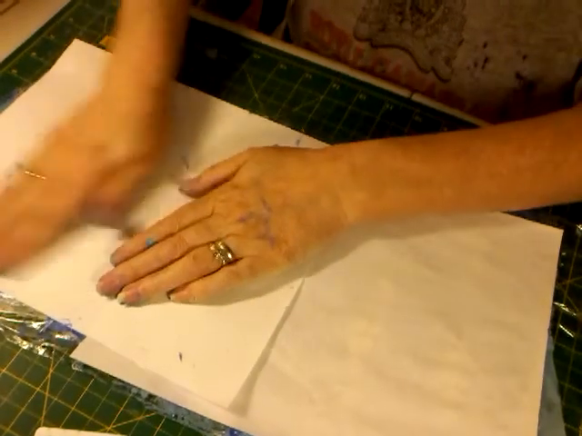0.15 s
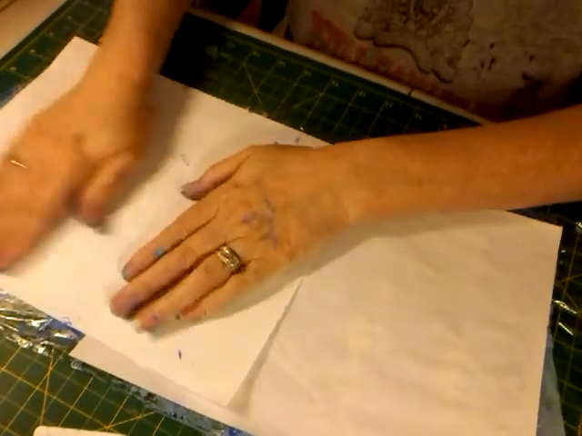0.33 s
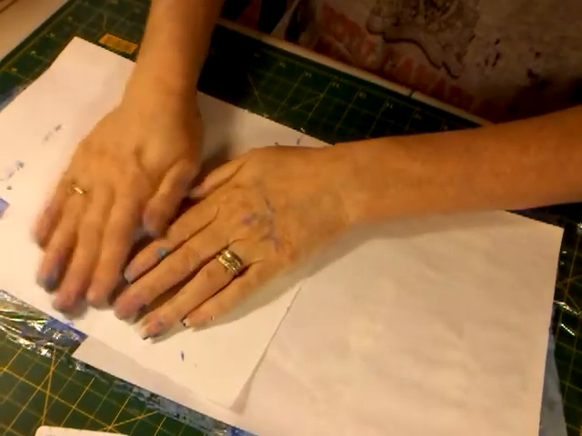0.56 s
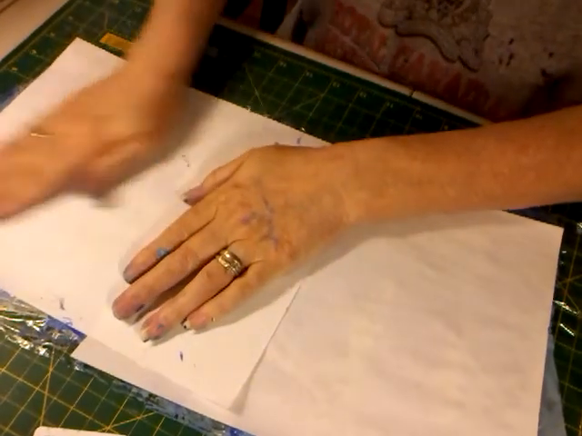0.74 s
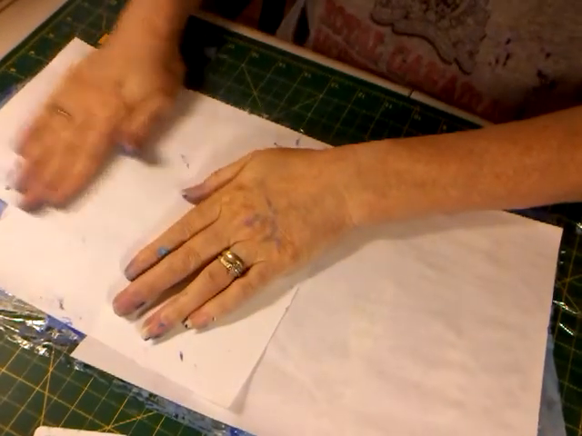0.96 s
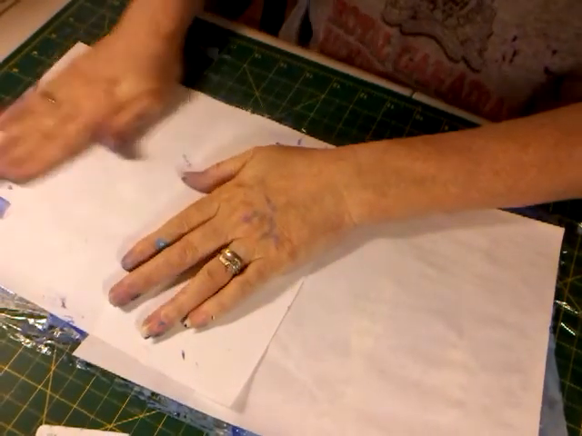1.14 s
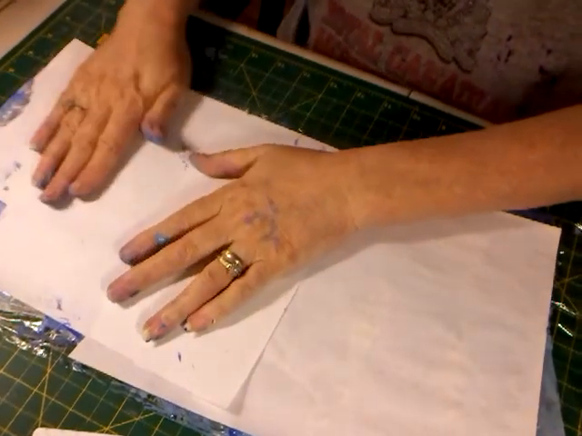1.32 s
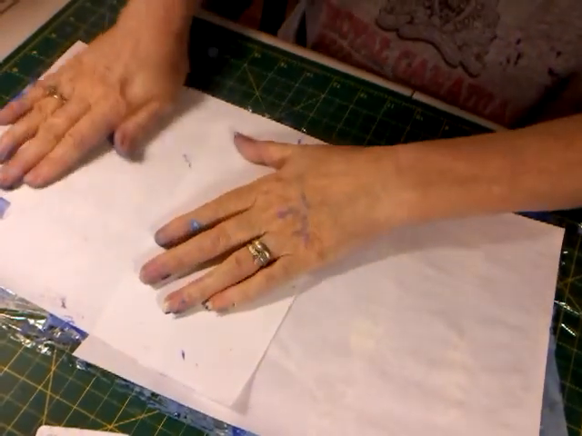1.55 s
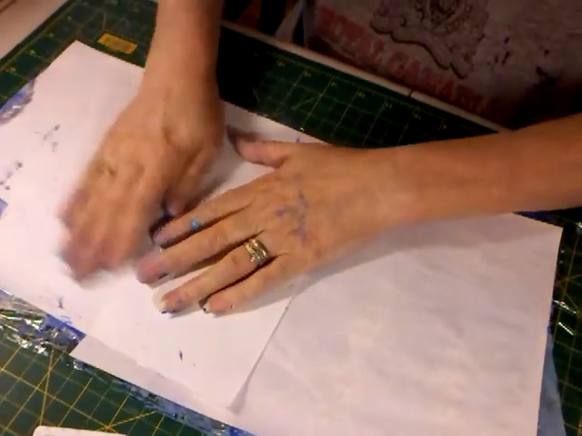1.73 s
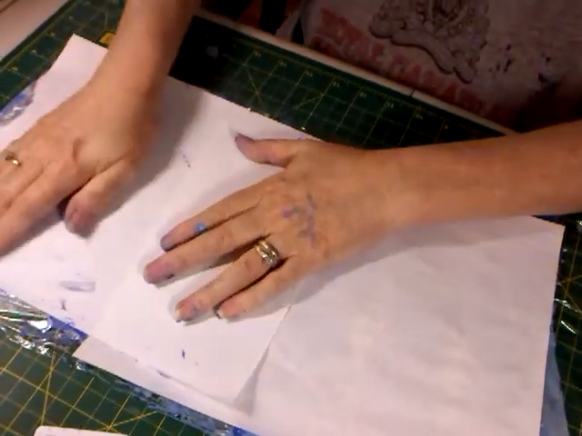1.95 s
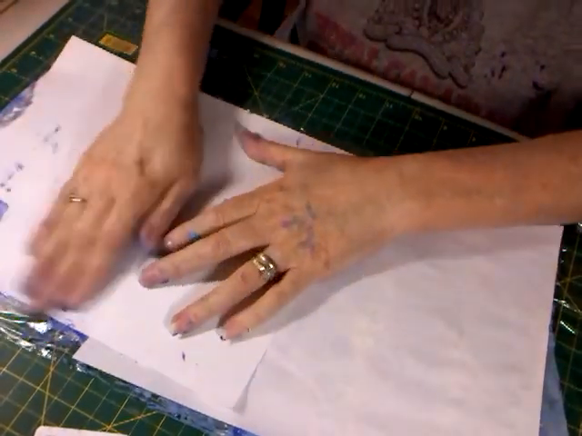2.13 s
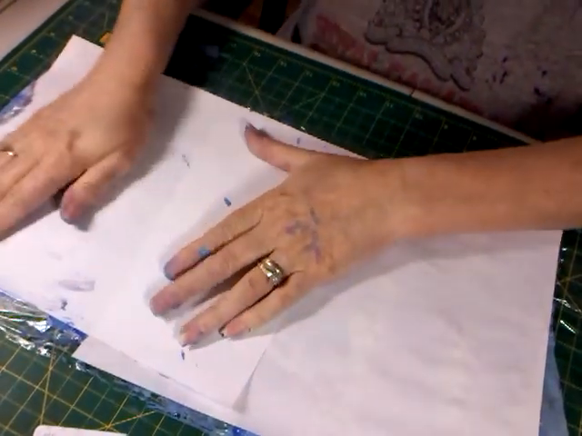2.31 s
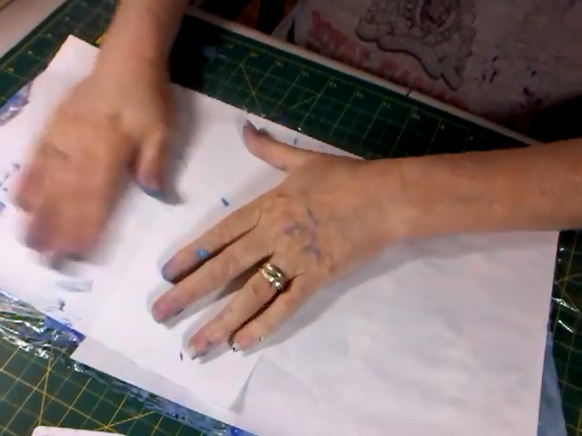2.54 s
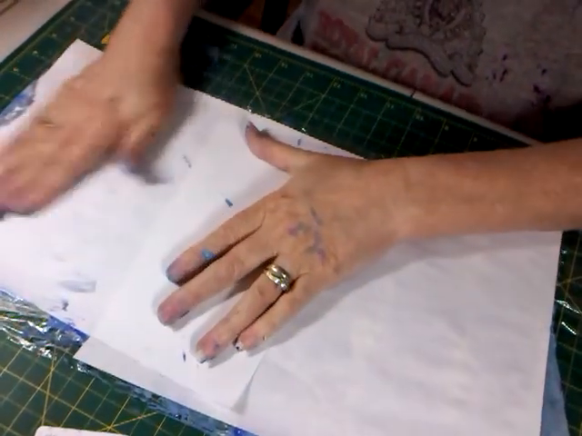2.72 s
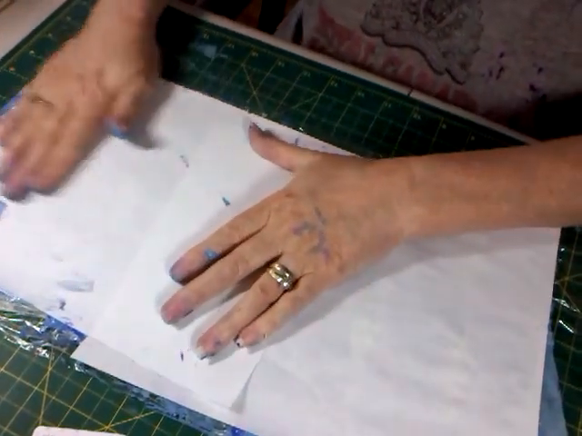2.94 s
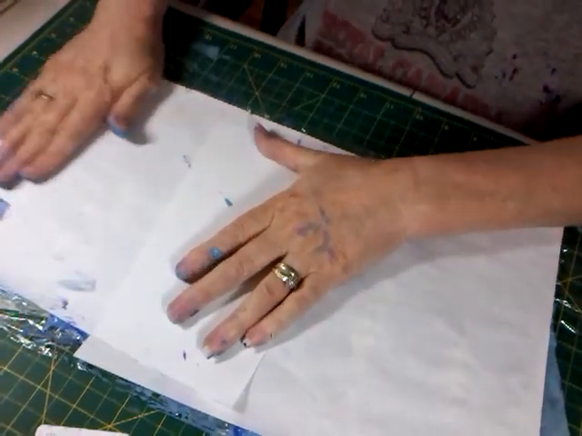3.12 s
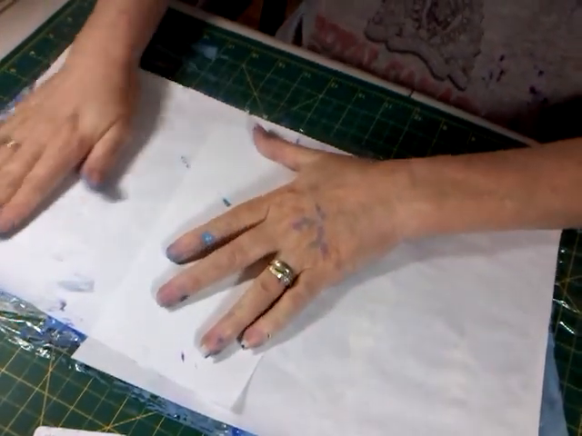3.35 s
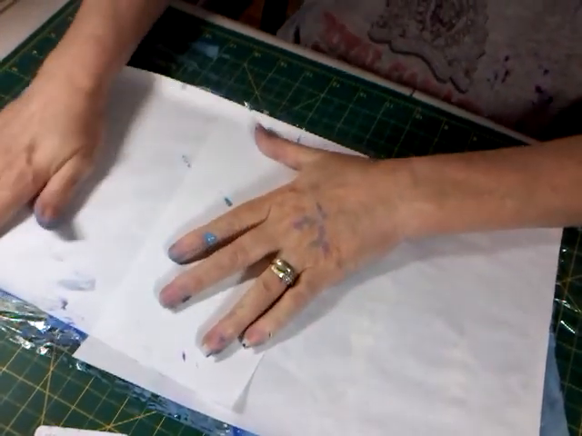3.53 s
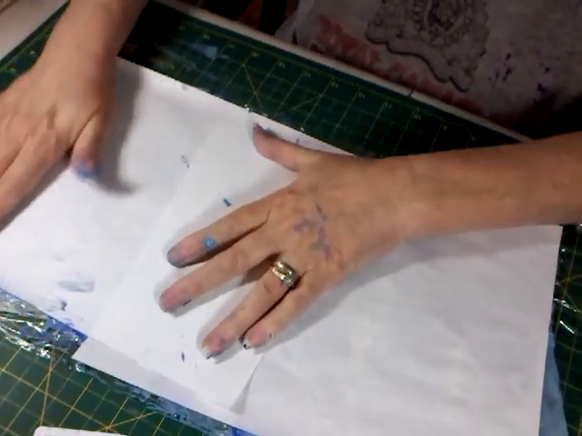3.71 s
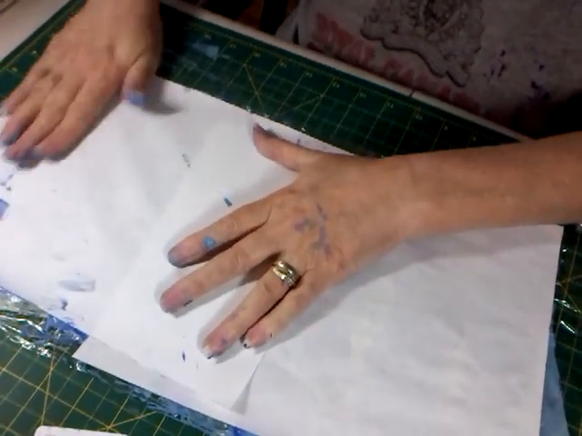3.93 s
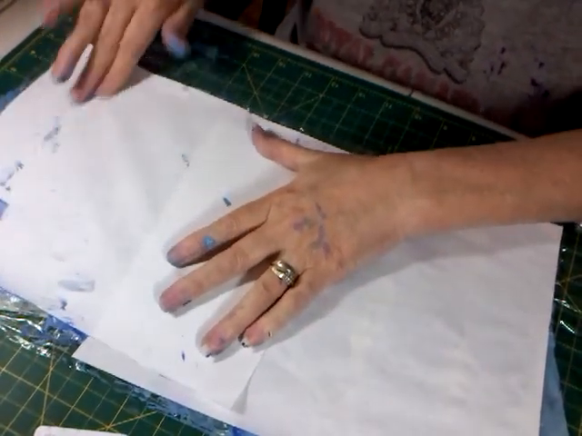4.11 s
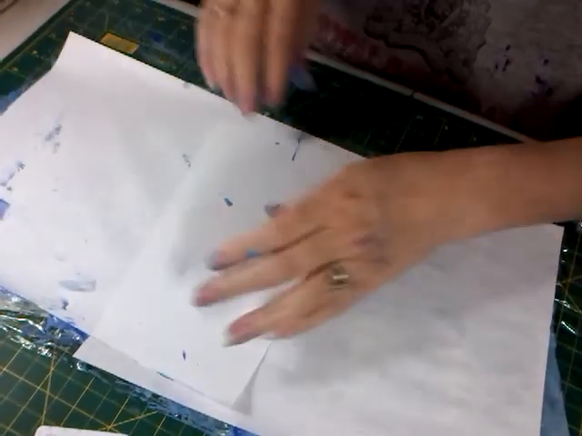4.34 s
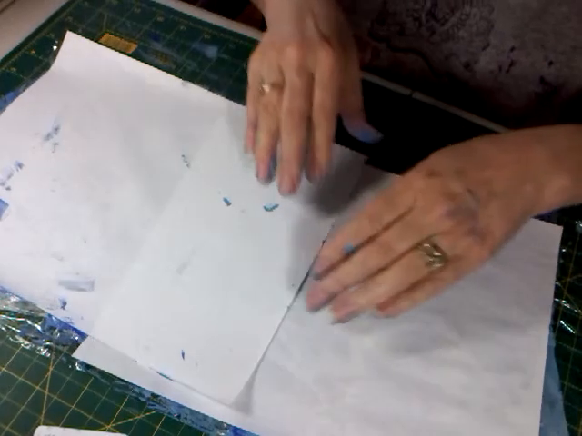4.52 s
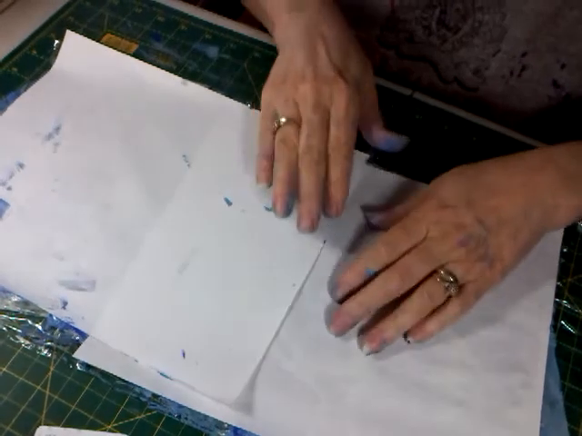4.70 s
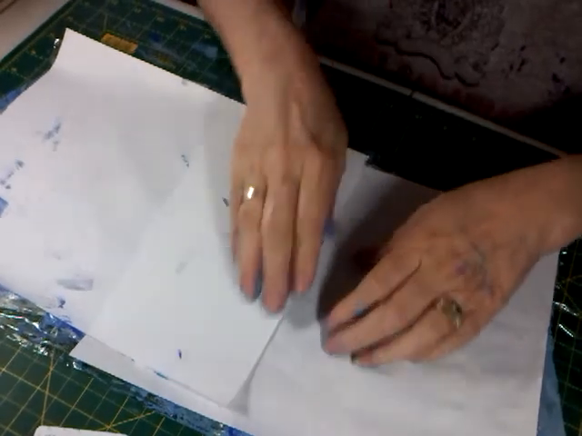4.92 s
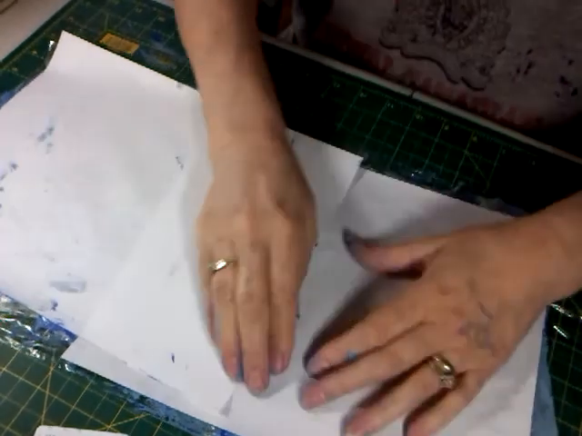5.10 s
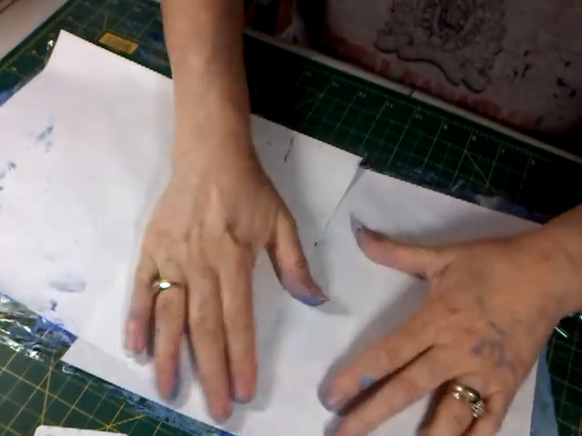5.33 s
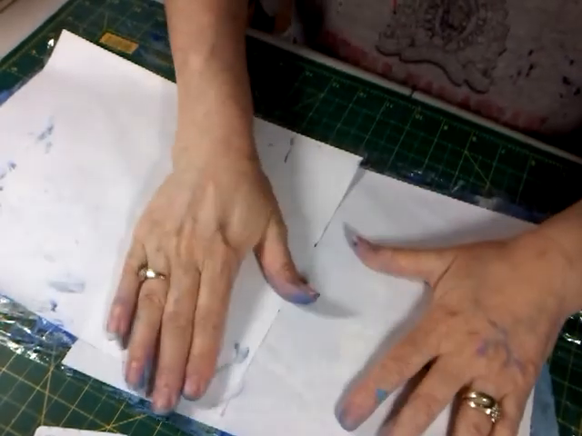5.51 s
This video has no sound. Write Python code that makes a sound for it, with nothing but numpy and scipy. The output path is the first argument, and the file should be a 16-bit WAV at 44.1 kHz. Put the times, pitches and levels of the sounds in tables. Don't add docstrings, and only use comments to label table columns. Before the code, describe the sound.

Fast dry swishes of a palm on paper gradually weaken, nearly stop, then a crackly touch-down leads into gentler smoothing.

```python
import sys
import numpy as np
from scipy import signal
from scipy.fft import rfft, irfft, next_fast_len
from scipy.io import wavfile
from scipy.ndimage import uniform_filter1d, map_coordinates

SR = 44100
rng = np.random.default_rng(int(sys.argv[2]) if len(sys.argv) > 2 else 0)


def field_ratio(decibels):
    return 10 ** (np.asarray(decibels, dtype=float) / 20)


def int16_out(signal):
    q = np.round(np.clip(np.atleast_2d(signal).T, -1, 1) * 32767)
    wavfile.write(sys.argv[1], SR, q.astype(np.int16))


N = 249606

# top_speed_s, hiss_db, speed_up_s, slow_down_s, sheet_re_hiss_db
STROKES = [(0.07, -29, 0.14, 0.13, -15), (0.303, -32, 0.09, 0.05, -18), (0.442, -30.5, 0.11, 0.091, -15),
           (0.609, -30, 0.098, 0.072, -15.5), (0.772, -30.5, 0.13, 0.085, -15.5),
           (0.911, -32, 0.081, 0.088, -15.5), (1.125, -33, 0.22, 0.087, -13), (1.32, -35, 0.11, 0.096, -14),
           (1.543, -37.5, 0.18, 0.11, -14), (1.812, -32.5, 0.14, 0.094, -19),
           (1.962, -36, 0.13, 0.22, -14.5), (2.212, -32, 0.098, 0.076, -17),
           (2.384, -32.5, 0.14, 0.097, -15.5), (2.551, -32, 0.085, 0.1, -15),
           (2.72, -32.5, 0.1, 0.079, -8.5), (2.875, -33.5, 0.09, 0.072, -13),
           (3.074, -35.5, 0.15, 0.098, -13.5), (3.278, -42.5, 0.072, 0.07, -10.5),
           (3.454, -39, 0.17, 0.22, -13), (3.601, -40, 0.17, 0.061, -10.5), (3.799, -42.5, 0.1, 0.12, -12),
           (3.9, -38.5, 0.16, 0.23, -14.5), (4.081, -42.5, 0.13, 0.14, -10),
           (4.245, -46, 0.17, 0.066, -14.5)]
# top_speed_s, hiss_db, speed_up_s, slow_down_s, sheet_re_hiss_db
BRUSHES = [(4.391, -55.5, 0.087, 0.088, -15), (4.495, -75, 0.022, 0.051, 1),
           (4.775, -55, 0.018, 0.057, -9.5), (4.883, -61, 0.055, 0.052, -13),
           (4.96, -53.5, 0.037, 0.049, -21), (5.025, -60, 0.048, 0.05, -11.0),
           (5.098, -42, 0.042, 0.029, -25), (5.137, -43, 0.038, 0.124, -20.5),
           (5.27, -37, 0.078, 0.127, -15.5), (5.42, -41, 0.14, 0.097, -15.5),
           (5.515, -40, 0.07, 0.12, -15.0), (5.673, -47.0, 0.079, 0.05, -19)]
# time_s, left_re_right_db
HAND_PLACE = [(0.0, 2.5), (0.2, 0), (0.22, 2.5), (1.32, 2), (1.35, -1.5), (1.99, 2.5), (4.85, 0.5),
              (5.23, 2.0), (5.66, -1.0)]
# freq_hz, gain_db
SHEET = [(300, -12), (600, -12), (950, -4.5), (1200, 0), (1550, 5.5), (1950, -0.5), (2600, 1.5), (3100, 0),
         (3900, -4), (4800, -17)]
# freq_hz, level_db_per_hz
TABLE = [(50, -45), (90, -28.5), (125, -1), (200, -2), (350, -1), (520, -2.5), (800, -8.5), (1200, -12.5)]
# time_s, rumble_db
LOAD = [(0, -61.5), (.3, -67), (1, -69), (2, -66), (3, -68), (4.25, -67.5), (4.45, -75.5), (4.55, -81.5),
        (4.72, -94), (4.799, -75), (5.05, -70), (5.2, -63.5), (5.66, -66)]
# time_s, table_db, stand_db, length_s
BUMPS = [(0.039, -52, -63, 0.066), (0.141, -59, -85, 0.041), (0.633, -68, -69.5, 0.035),
         (1.483, -60, -85, 0.041), (1.814, -61, -62, 0.024), (3.213, -81, -58, 0.029),
         (3.677, -92, -72, 0.031), (4.302, -92, -55, 0.015), (4.47, -75, -61, 0.11),
         (4.837, -88, -65, 0.12), (5.137, -60.5, -55, 0.026)]
# start_s, peak_db, thump_re_peak_db, crackle_t60_s
TICKS = [(4.5314, -51.5, -11, 0.018), (4.5404, -66, 0, 0.02), (4.755, -49, -22, 0.013),
         (4.7716, -37, -16, 0.022), (5.007, -62, -19, 0.019), (5.0273, -43.5, -4, 0.018),
         (5.0765, -35.5, -31, 0.03), (5.0922, -32, -31, 0.023), (5.096, -27.5, -35, 0.016),
         (5.116, -34, -22, 0.0078), (5.1278, -29.5, -15, 0.015), (5.139, -32.5, -18, 0.022),
         (5.1521, -29.5, -25, 0.0084), (5.268, -30, -36, 0.016), (5.5097, -32, -37, 0.019)]
# freq_hz, level_db_per_hz
STAND = [(15, -33), (30, -9.5), (60, -3.5), (100, -0.5), (130, -10), (200, -41.5)]
# freq_hz, level_db_per_hz
ROOM = [(25, 1), (60, 1), (130, 21), (300, 15.5), (500, 3), (900, -0.5), (2000, -1.5), (4200, -10),
        (6200, 2), (9000, -9), (14500, -5)]
# freq_hz, gain_db
LEFT_PORT = [(100, -15.5), (2000, -23), (4000, -12.5), (5800, -7.5), (6700, -2.5), (7600, -1), (8600, -7),
             (10000, -13.5), (12000, -20.5), (14500, -22.5)]
# freq_hz, gain_db
RIGHT_PORT = [(100, -12.5), (2000, -24.5), (3300, -15), (4300, -10.5), (5200, -4), (5900, 4.5),
              (6500, -1.5), (7600, -10.5), (9500, -19.5), (14500, -30)]
# freq_hz, share
COMMON_SHARE = [(40, 0.79), (130, 0.72), (400, 0.34), (800, 0.2), (1400, 0.15), (1900, 0.079), (2900, 0.24),
                (4000, 0.24), (7300, 0.071), (10000, 0.15)]
# freq_hz, level_re_loudness_db
LINE_FLOOR = [(40, -9), (110, -9.5), (300, -13), (800, -8.5), (1400, -9), (2100, -7.5), (3400, -3),
              (4100, 0), (4700, -1), (5400, -25)]

STROKE_DROP_DB, RISE_POWER, FALL_POWER = 20, 1.75, 2.0
SHEET_LINGER_RATIO = 1.15
SIZZLE_RE_HISS_DB, SIZZLE_DB_PER_DB = -9.5, 0.12
SWING_DB_PER_DB = -0.0162
STAND_DB, STAND_LUMPS_DB = -80, 2.5
STAND_DROP_DB_PER_DB = 0.35
ROOM_DB = -65.5
PORT_LAG_S = 0.00019
TOP_HZ, FRAME_START_SAMPLES, FINE_BELOW_DB = 14600, 870, -58
OFFSET = -0.0003


def rubbing():
    hiss_db, sheet_db = hand()
    time_s = np.arange(N) / SR
    sizzle_db = SIZZLE_RE_HISS_DB + SIZZLE_DB_PER_DB * (hiss_db + 39.5)
    swing_db = SWING_DB_PER_DB * (hiss_db - uniform_filter1d(hiss_db, SR // 2))
    place_db = np.interp(time_s, *np.transpose(HAND_PLACE)) + swing_db - 0.6
    grip_db = 1.0 * wobble(45) + 0.26 * wobble(160)

    below = lambda hz: 1 / np.sqrt(1 + (hz / 10200) ** 12)
    above = lambda hz: 1 / np.sqrt(1 + (4200 / (hz + 1)) ** 8)
    hiss = heard(catches(spread_db=2.04, patchy_db=0.77), lambda hz: below(hz) * above(hz))
    sizzle = heard(catches(spread_db=1.0, patchy_db=-0.76), lambda hz: np.sqrt(1 - below(hz) ** 2))
    sheet = heard(catches(spread_db=1.0, patchy_db=2.0), lambda hz: field_ratio(along(SHEET, hz)))
    faint_db = 1.0 + 0.5 * np.minimum(hiss_db + 43.0, 0)
    fibres = field_ratio(hiss_db) * (hiss + field_ratio(sizzle_db + 6.0) * sizzle)
    skin = field_ratio(grip_db) * (fibres + field_ratio(sheet_db + faint_db) * sheet)

    table = filtered(catches(spread_db=0.96, patchy_db=1.0), lambda hz: field_ratio(along(TABLE, hz)))
    table = unit(table * field_ratio([[2.2], [-2.2]]))
    table_db = np.interp(time_s, *np.transpose(LOAD))
    rumble = loaded(table_db, column=1) * field_ratio(11.5 + 3.05 * wobble(13)) * table
    return skin * field_ratio(np.array([place_db, -place_db]) / 2) + rumble


def hand():
    top_s, hiss_db, rise_s, fall_s, sheet_db = np.transpose(STROKES + BRUSHES)
    hiss = humps(top_s, hiss_db, rise_s, fall_s)
    sheet = humps(top_s, hiss_db + sheet_db, SHEET_LINGER_RATIO * rise_s, SHEET_LINGER_RATIO * fall_s)
    return hiss, sheet


def humps(top_s, db, rise_s, fall_s):
    knots = np.arange(0, N, 64)
    late_s = knots / SR - top_s[:, None]
    rising = late_s < 0
    away = np.where(rising, -late_s / np.abs(rise_s)[:, None], late_s / np.abs(fall_s)[:, None])
    swell_db = db[:, None] - STROKE_DROP_DB * away ** np.where(rising, RISE_POWER, FALL_POWER)
    power = (field_ratio(swell_db) ** 2).sum(axis=0)
    return np.interp(np.arange(N), knots, 10 * np.log10(power + 1e-11))


def catches(spread_db, patchy_db):
    ticks = rng.standard_normal((2, N)) * field_ratio(spread_db * rng.exponential(size=N))
    spectrum = signal.stft(ticks, nperseg=256)[2]
    patches = rng.standard_normal(spectrum.shape[1:])
    patches = uniform_filter1d(uniform_filter1d(patches, size=5, axis=0), size=8, axis=1)
    rough = signal.istft(spectrum * field_ratio(patchy_db * unit(patches)), nperseg=256)[1]
    return pair(rough[:, :N])


def loaded(steady_db, column):
    bumps = np.transpose(BUMPS)
    return np.hypot(field_ratio(steady_db), field_ratio(humps(bumps[0], bumps[column], bumps[-1], bumps[-1])))


def touches():
    crackle, thump = np.zeros((2, N + SR)), np.zeros(N + SR)
    t = np.arange(SR // 10) / SR
    for start_s, peak_db, thump_db, t60_s in TICKS:
        i = round(start_s * SR)
        burst = rng.standard_normal((2, len(t))) * field_ratio(-60 * t / t60_s) * (1 - np.exp(-t / 0.00046))
        crackle[:, i:i + len(t)] += field_ratio(peak_db + 7) * burst
        swell = field_ratio(peak_db + thump_db - 7 - 60 * t / 0.3) * (1 - np.exp(-t / 0.014))
        thump[i:i + len(t)] += swell * np.sin(2 * np.pi * 150 * t)
    return ports(crackle[:, :N]) + thump[:N] * np.array([[1.3], [-0.9]])


def stand():
    drop_db = STAND_DROP_DB_PER_DB * (hand()[0] + 40).clip(-30)
    steady_db = STAND_DB - drop_db + STAND_LUMPS_DB * wobble(13)
    shudder = filtered(pair(rng.standard_normal((2, N))), lambda hz: field_ratio(along(STAND, hz)))
    return loaded(steady_db, column=2) * field_ratio(4.5) * unit(shudder * field_ratio([[1.3], [-1.3]]))


def room():
    air = filtered(pair(rng.standard_normal((2, N))), lambda hz: field_ratio(along(ROOM, hz)))
    return field_ratio(ROOM_DB + 2.7 * wobble(9)) * unit(air * field_ratio([[1.2], [-1.2]]))


def heard(x, shape):
    return unit(filtered(x, lambda hz: shape(hz) * field_ratio([along(LEFT_PORT, hz), along(RIGHT_PORT, hz)])))


def ports(x):
    return np.array([filtered(x[0], causal(LEFT_PORT)), filtered(x[1], causal(RIGHT_PORT))])


def pair(x):
    share = lambda hz: np.clip(along(COMMON_SHARE, hz), 0, 1)
    common = filtered(x[0], lambda hz: -share(hz) * np.exp(-2j * np.pi * hz * PORT_LAG_S))
    own = filtered(x[1], lambda hz: np.sqrt(1 - share(hz) ** 2))
    return np.array([x[0], common + own])


def causal(points):
    def response(hz):
        cepstrum = irfft(np.log(field_ratio(along(points, hz))))
        half = len(cepstrum) // 2
        cepstrum[1:half] *= 2
        cepstrum[half + 1:] = 0
        return np.exp(rfft(cepstrum))
    return response


def filtered(x, response):
    m = next_fast_len(N + 8192)
    return irfft(rfft(x, m) * response(np.fft.rfftfreq(m, 1 / SR)), m)[..., :N]


def along(points, hz):
    f, v = np.transpose(points)
    return np.interp(np.log(hz + 1), np.log(f + 1), v)


def wobble(rate_hz):
    knots = rng.standard_normal(int(N * rate_hz / SR) + 4)
    return map_coordinates(knots, [np.arange(N) * rate_hz / SR])


def unit(x):
    return x / np.sqrt(np.mean(x ** 2) + 1e-20)


def starved(x, size=1024, count=256):
    n, k = np.arange(2 * size), np.arange(count)
    basis = np.cos(np.pi / size * np.outer(n + 0.5 + size / 2, k + 0.5)) * np.sqrt(2 / size)
    basis *= np.sin(np.pi * (n + 0.5) / (2 * size))[:, None]
    lead = 2 * size - FRAME_START_SAMPLES
    index = np.arange(N // size + 4)[:, None] * size + n
    frames = np.pad(x, ((0, 0), (lead, 4 * size)))[:, index]
    loudness = np.sqrt(np.mean(np.diff(frames) ** 2, axis=(0, 2)) + 1e-20)[:, None]
    coarseness = np.minimum(loudness / field_ratio(FINE_BELOW_DB), 1)
    line_hz = (k + 0.5) * SR / (2 * size)
    step = 2 * loudness * coarseness * field_ratio(along(LINE_FLOOR, line_hz))
    lines = frames @ basis
    error = lines - step * np.round(lines / step)
    return x - [np.bincount(index.ravel(), (e @ basis.T).ravel())[lead:][:N] for e in error]


def scene():
    return rubbing() + touches() + stand() + room()


def band_limit(x):
    return signal.sosfilt(signal.butter(12, 15720, fs=SR, output="sos"), x)


def record(dry):
    limited = filtered(dry, lambda hz: hz < TOP_HZ)
    mix = starved(limited) + OFFSET
    return band_limit(mix)


dry = scene()
out = record(dry)
int16_out(out)
```